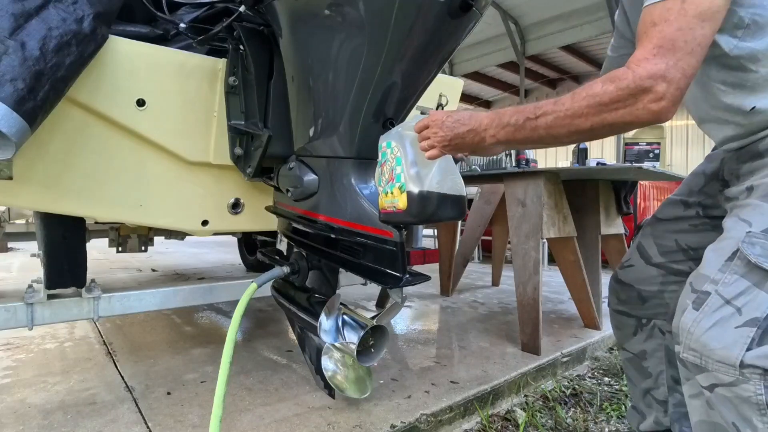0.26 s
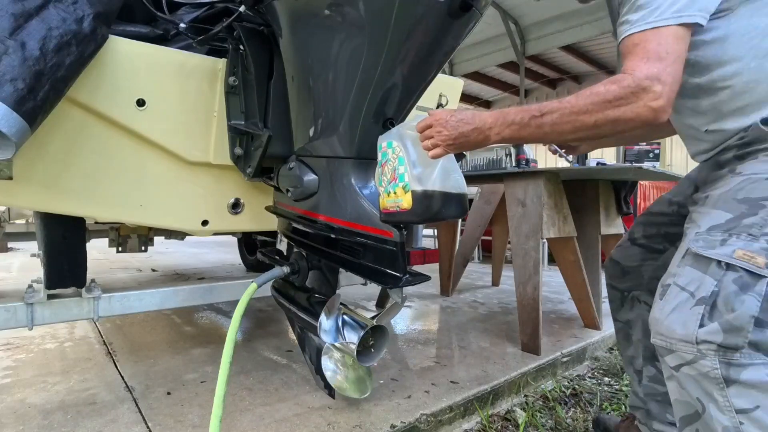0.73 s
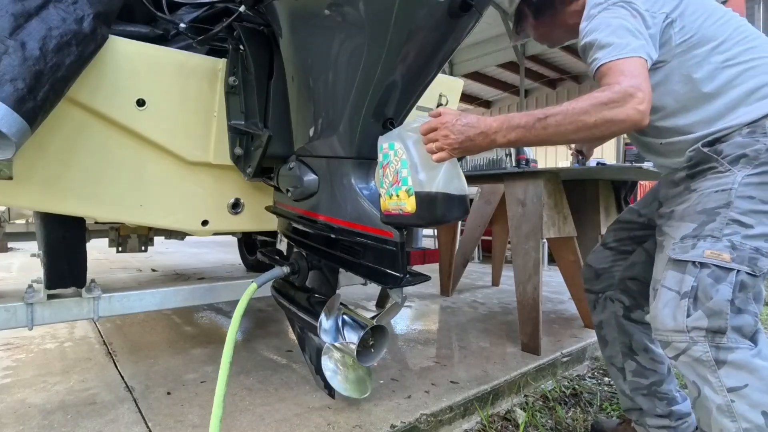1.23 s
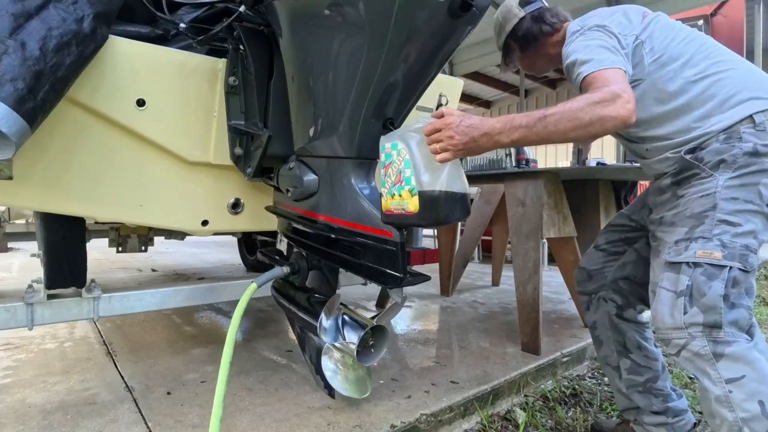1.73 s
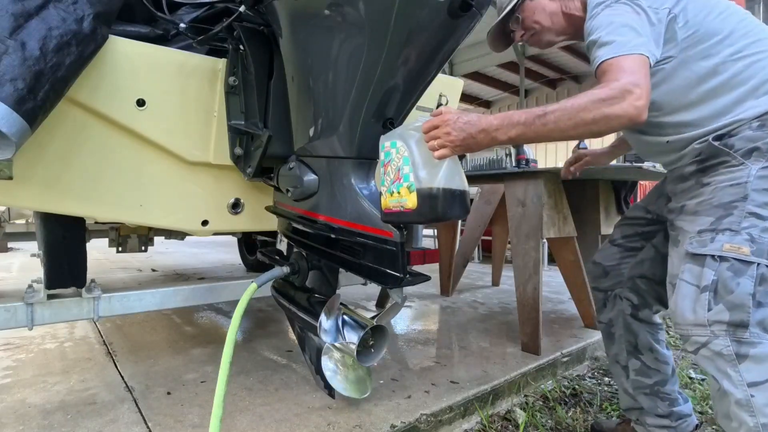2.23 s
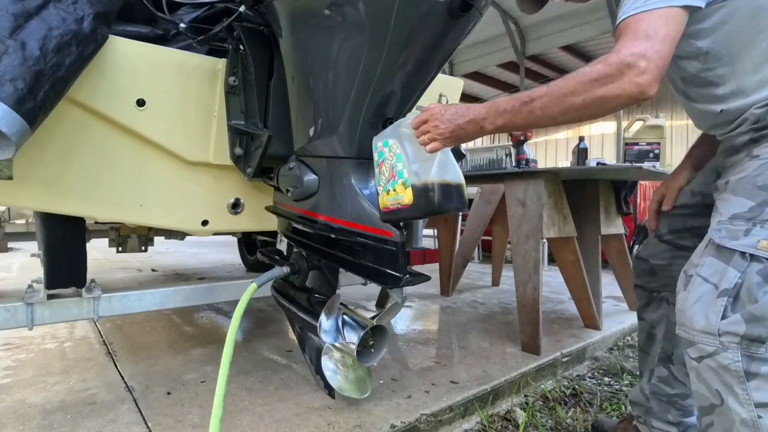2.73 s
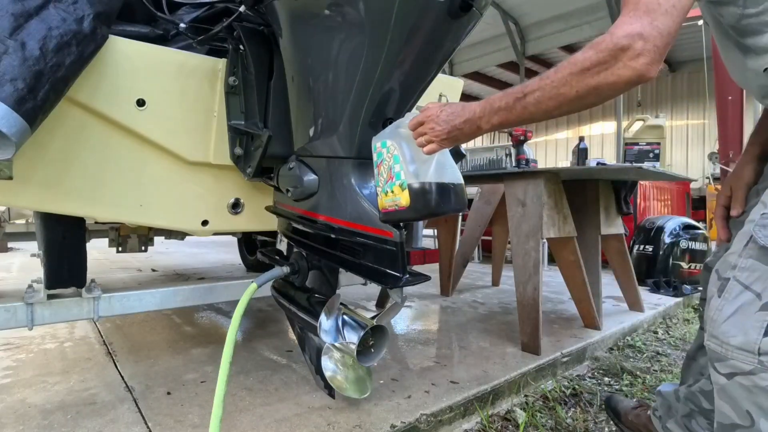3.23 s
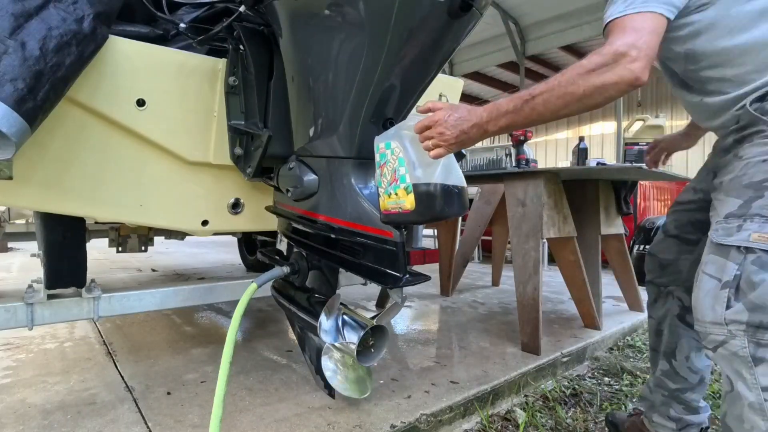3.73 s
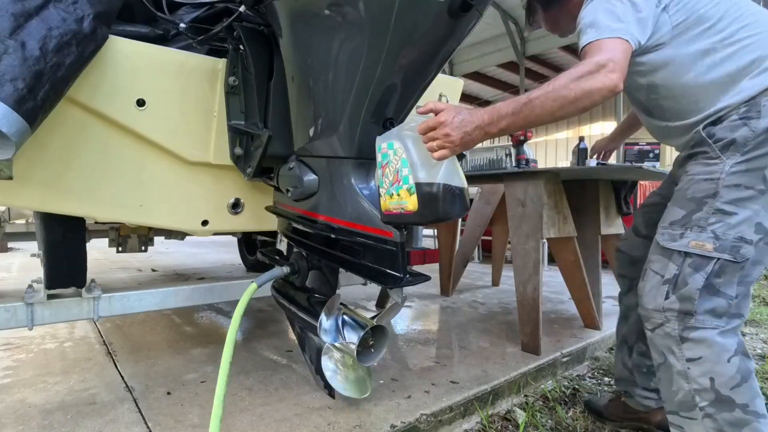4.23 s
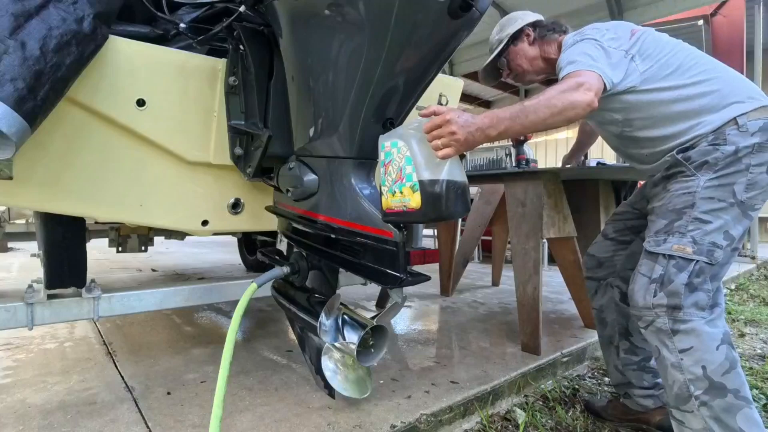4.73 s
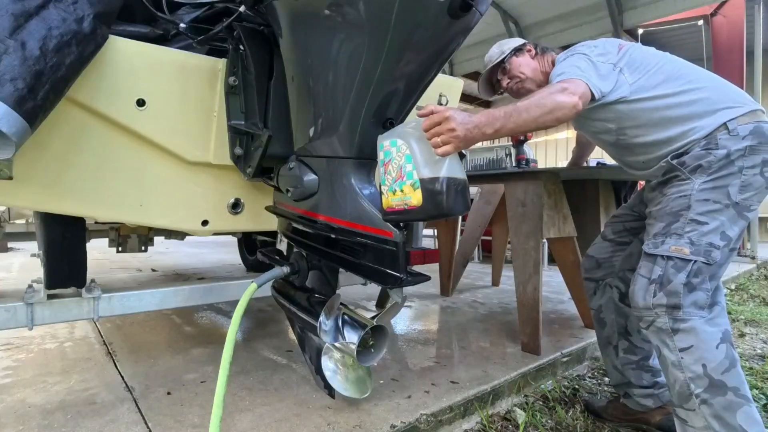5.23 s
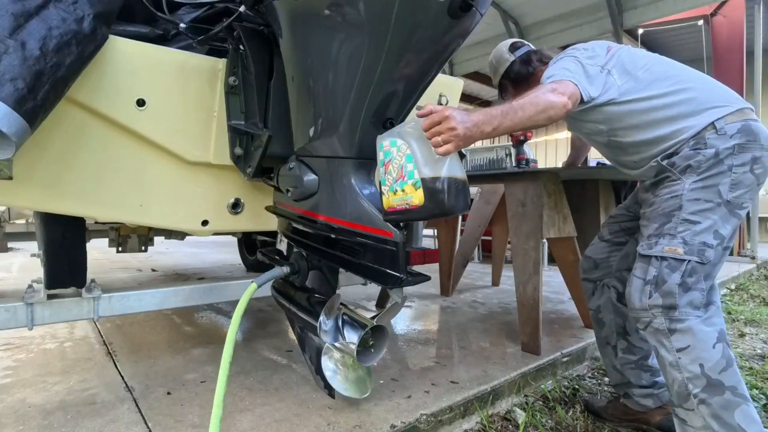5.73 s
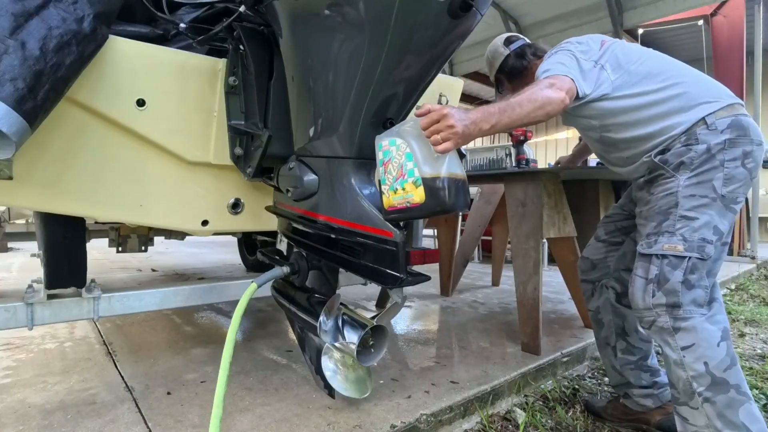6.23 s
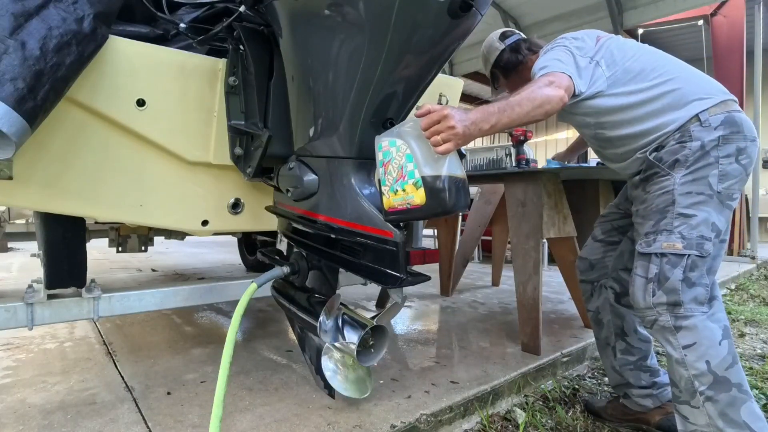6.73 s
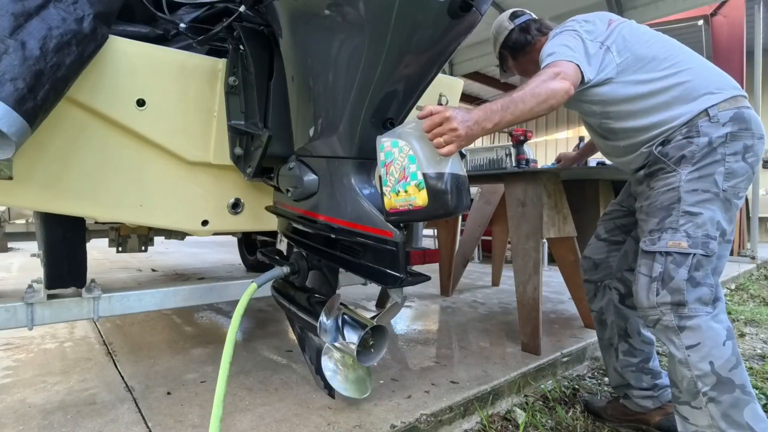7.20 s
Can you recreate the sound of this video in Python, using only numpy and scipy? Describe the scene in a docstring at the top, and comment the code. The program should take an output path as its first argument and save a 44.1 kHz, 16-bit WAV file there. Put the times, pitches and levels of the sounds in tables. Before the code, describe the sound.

Boots scuff on gritty concrete, a heavy wrench clatters onto a plywood bench, then small metal parts slide and clink over a low distant drone.

```python
"""Scuffs and a dropped wrench in a metal shed

Boots scuff on gritty concrete: clumped random grains, coloured as crunch and grit, with short sole yelps.
A wrench drops on a plywood bench, small parts tick, clink and slide there, and a jug bumps a motor:
blows ring tuned modes, drags are friction grains, ticks are noise puffs, clinks are beating partials.
The shed adds a dull echo. A flickering treble hiss, bird whistles, insect bands and a traffic drone lie
behind. A fast limiter ducks the loud blows."""
import sys
import numpy as np
from scipy import signal
from scipy.fft import rfft, irfft
from scipy.io import wavfile
from scipy.ndimage import uniform_filter1d

SR = 44100
rng = np.random.default_rng(int(sys.argv[2]) if len(sys.argv) > 2 else 0)


def unload_wav(signal):
    """Save mono or channel-first audio to the path in sys.argv[1] as 16-bit WAV at rate SR, clipped to [-1, 1]."""
    wavfile.write(
        sys.argv[1],
        SR,
        np.round(np.clip(np.atleast_2d(signal).T, -1, 1) * 32767).astype(np.int16),
    )


N = 328986  # length in samples


def amp(db):
    """Decibels to gain."""
    return 10 ** (np.asarray(db) / 20)


def rms_one(x):
    """Scale to unit rms."""
    return x / np.sqrt(np.mean(x ** 2) + 1e-20)


def drift(rate_hz):
    """Slow random wander of unit rms: noise smoothed by a double pole, at a fortieth of the sample rate."""
    pole = np.exp(-80 * np.pi * rate_hz / SR)
    white = rng.standard_normal(N // 40 + 2002)
    slow = signal.lfilter([1], [1, -2 * pole, pole * pole], white)
    slow = rms_one(slow[2000:])  # skip the filter's start
    return np.interp(np.arange(N) / 40, np.arange(len(slow)), slow)


def colour(x, spectrum):
    """Filter a signal by a table of frequency and relative level; unit rms."""
    hz, db = np.transpose(spectrum)
    grid_hz = np.maximum(np.fft.rfftfreq(N, 1 / SR), 1)
    gain = amp(np.interp(np.log(grid_hz), np.log(hz), db))
    return rms_one(irfft(rfft(x) * gain, N))


def narrow(hz, width_hz):
    """Noise passed twice through one resonance of this width; unit rms."""
    radius = np.exp(-np.pi * width_hz / SR)
    poles = [1, -2 * radius * np.cos(2 * np.pi * hz / SR), radius * radius]
    once = signal.lfilter([1, 0, -1], poles, rng.standard_normal(N))
    return rms_one(signal.lfilter([1, 0, -1], poles, once))


def ring(clicks, hz, t60_s):
    """A damped resonator: a unit click sets a sine of starting height 1 ringing."""
    radius = amp(-60 / (max(t60_s, .003) * SR))
    turn = 2 * np.pi * hz / SR
    poles = [1, -2 * radius * np.cos(turn), radius * radius]
    return signal.lfilter([0, np.sin(turn)], poles, clicks + 1e-18)


def strike(events, modes, spread_db, level_db, contact_s):
    """Each blow, a short chatter, rings every mode by a random share; a contact cut-off dulls its top."""
    t = np.arange(SR // 25) / SR
    out = np.zeros(N)
    luck = rng.normal(0, 1, (len(events), len(modes)))
    chatters = rng.standard_normal((len(events), len(t))) * np.exp(-t / contact_s)
    for k, (hz, mode_db, t60_s) in enumerate(modes):
        force = np.zeros(N)
        for (start_s, blow_db, *cut_hz), chatter, z in zip(events, chatters, luck[:, k]):
            softness = 1 / (1 + (hz / cut_hz[0]) ** 2) if cut_hz else 1
            near_mode = ring(chatter, hz, 11.4 / hz)  # keep the chatter close to the mode's pitch
            ring_peak = abs(ring(near_mode, hz, t60_s)).max()
            gain = softness * amp(blow_db + mode_db + level_db + spread_db * z)
            force[int(start_s * SR):][:len(t)] += gain * near_mode / ring_peak
        out += ring(force, hz, t60_s)
    return out


def puffs(events, octaves, decay_s):
    """Each event is a dying puff of noise in a band around its centre, scaled to its peak level."""
    out = np.zeros(N + SR)
    t = np.arange(SR // 10) / SR
    half_band = max(octaves, .1) * np.array([-.5, .5])
    for (start_s, peak_db, centre_hz), white in zip(events, rng.standard_normal((len(events), len(t)))):
        edges_hz = np.clip(centre_hz * 2 ** half_band, [300, 400], [14000, 18000])
        band = signal.butter(2, edges_hz, "band", fs=SR, output="sos")
        puff = signal.sosfilt(band, white * np.exp(-t / decay_s))
        out[int(start_s * SR):][:len(t)] += amp(peak_db) * puff / abs(puff).max()
    return out[:N]


def grains(per_s, spread_db, clump_db):
    """Random contacts of uneven size and either sign, whose size swells and sinks in clumps."""
    born = rng.random(N) < per_s / SR
    sizes = amp(spread_db * np.minimum(rng.exponential(1, N), 5) + clump_db * drift(37))
    return born * sizes * rng.choice([-1, 1], N)


def friction(gains, low_colour, high_colour, clump_db):
    """Dense contacts sound in a body and, from a denser set, in a treble."""
    body_gain, treble_gain = gains
    body = colour(grains(5000, 2.2, clump_db), low_colour)
    treble = colour(grains(9000, 3.22, clump_db), high_colour)
    return body_gain * body + treble_gain * treble


def stroke(rows):
    """Gains of body and treble along one stroke, silent outside it."""
    t = np.arange(N) / SR
    time_s, body_db, treble_share_db = np.transpose(rows)
    inside = (t >= time_s[0]) & (t <= time_s[-1])
    body = amp(np.interp(t, time_s, body_db)) * inside
    return body, body * amp(np.interp(t, time_s, treble_share_db))


def scuff_gains():
    """Each scuff swells to its peak and dies away; the powers of overlapping scuffs add."""
    # boots on grit: peak_s, crunch_db, rise_s, fall_s, treble_share_db (treble against crunch)
    scuff_rows = [(.02, -42, 0.33, 0.091, -3), (.55, -33.5, 0.0227, 0.063, -4), (.6, -47, .02, 0.19, -1.3),
                  (.812, -47, 0.012, 0.17, 2), (.986, -50, 0.28, 0.072, -6.5),
                  (1.025, -60.5, .08, .022, 7.5), (1.13, -68, 0.092, 0.065, 0),
                  (2.864, -57, 0.033, .1, 3.5), (2.916, -53, 0.047, 0.048, 0.5),
                  (3.0, -61, 0.12, 0.15, -2.5), (3.584, -50, 0.031, 0.024, -2.5),
                  (3.686, -55.5, 0.0097, 0.19, 0), (3.9, -37, 0.11, 0.13, 1.5), (3.99, -48, 0.23, .2, 8),
                  (4.06, -35.5, .035, 0.15, 2.5), (4.23, -30.5, 0.067, 0.095, -7),
                  (4.285, -27, 0.08, 0.039, -2), (4.33, -50, .02, .13, 4), (6.98, -64.5, .02, 0.018, -3),
                  (7.024, -58.5, 0.024, 0.018, -5)]
    span_db = 20  # rise and fall are the times to cover this much
    t, body, treble = np.arange(N) / SR, np.zeros(N), np.zeros(N)
    for peak_s, crunch_db, rise_s, fall_s, treble_share_db in scuff_rows:
        first = max(int((peak_s - 4 * rise_s) * SR), 0)
        near = slice(first, int((peak_s + 4 * fall_s) * SR))
        distance = np.maximum((peak_s - t[near]) / rise_s, (t[near] - peak_s) / fall_s)
        power = amp(crunch_db - span_db * distance) ** 2
        body[near] += power
        treble[near] += power * amp(treble_share_db) ** 2
    return np.sqrt(body), np.sqrt(treble)


def boots():
    """Soles grind grit on concrete as clumped grains; the rubber yelps in short pitched puffs."""
    # body of the scuffs: frequency_hz, relative_db per Hz
    crunch_colour = [(180, -42), (300, -4), (385, -4), (620, -5), (880, -8), (1480, -2.5), (1950, -2),
                     (2930, -4), (3840, -6.5), (4500, -8), (5850, -43.5), (9900, -120)]
    # treble of the scuffs: frequency_hz, relative_db per Hz
    grit_colour = [(2060, -33.5), (3500, -17.5), (4240, -12.5), (4840, 0), (7460, -1), (15000, -13),
                   (16000, -32.5)]
    # rubber sole yelps: start_s, peak_db, centre_hz
    yelp_rows = [(.541, -34, 2340), (0.563, -25, 1490), (3.861, -35, 1197), (4.216, -21, 2940),
                 (4.222, -17.5, 1434), (4.227, -23.5, 2850), (4.259, -23.5, 1400), (4.272, -23, 2310)]
    scuffing = friction(scuff_gains(), crunch_colour, grit_colour, clump_db=2.0)
    return scuffing + puffs(yelp_rows, octaves=0.27, decay_s=0.0073)


def bench_friction():
    """The wrench rattles out its fall and parts drag on plywood: grains in a board body and a treble."""
    # the wrench's fall: time_s, board_db, treble_share_db (treble against board)
    fall_rows = [(1.772, -56, -1), (1.776, -19.5, -8.5), (1.864, -12, -13.5), (1.944, -22.5, -12.5),
                 (2.01, -31, -17.5), (2.088, -41.5, -12.5), (2.4, -70.5, -35)]
    # board under the fall: frequency_hz, relative_db per Hz
    board_colour = [(53, -40.5), (90, -13.5), (119, -3), (236, -10), (284, -1.5), (341, -7.5), (404, -4),
                    (723, -11), (1010, -9), (1480, -13.5), (1760, -16.5), (2310, -21.5), (3500, -37.5),
                    (4550, -61.5), (7700, -120)]
    # treble of the fall: frequency_hz, relative_db per Hz
    jangle_colour = [(1650, -32), (2800, -6), (4840, -12), (6110, -7), (6250, -4.5), (6670, 0.5),
                     (7720, -15.5), (13700, -23), (16000, -34.5)]
    # parts dragged over the bench: time_s, board_db, treble_share_db (treble against board)
    slide_rows = [(5.68, -84, 0.5), (5.8, -65.5, 4), (5.93, -45.5, -10.5), (5.976, -51, -2.5),
                  (6.002, -47, -5), (6.014, -34, -1), (6.066, -42.5, -6), (6.19, -48.5, -3.5),
                  (6.56, -44.5, -9), (6.57, -32, -16), (6.63, -40, -9.5), (6.678, -37, -15),
                  (6.72, -77, -22)]
    # board under the dragging: frequency_hz, relative_db per Hz
    drag_colour = [(150, -22), (250, -2), (302, 2.5), (480, -7.5), (871, -12.5), (962, -14), (1460, -13.5),
                   (1580, -16), (3500, -29.5), (4550, -52), (7700, -120)]
    # treble of the dragging: frequency_hz, relative_db per Hz
    sheen_colour = [(1650, -5.5), (2800, -2.5), (4470, -8), (5440, -8), (7550, -10), (11700, -21.5),
                    (16000, -34)]
    fall = friction(stroke(fall_rows), board_colour, jangle_colour, clump_db=1.5)
    slide = friction(stroke(slide_rows), drag_colour, sheen_colour, clump_db=1.5)
    return fall + slide


def bench_knocks():
    """Blows on plywood ring its damped modes; a softer contact excites less of the top."""
    # knocks on the bench: start_s, relative_db, contact_cut_hz (higher is harder)
    knock_rows = [(1.7755, -6, 3000), (1.80, -14, 2500), (1.819, -0.5, 2500), (1.849, -7, 2000),
                  (1.88, -4.5, 1500), (1.951, -2.5, 450), (1.973, -7, 1520), (2.028, -13, 463),
                  (5.921, -31.5, 3020), (6.013, -52, 4000), (6.033, -45, 3000), (6.069, -22, 900),
                  (6.359, -30.5, 1500), (6.492, -24.5, 2000), (6.569, -20.5, 1490), (6.599, -20, 1200),
                  (6.659, -20, 920)]
    # modes of the bench: frequency_hz, relative_db, t60_s
    bench_modes = [(286.8, -3, 0.15), (386.5, -12, 0.16), (626, -6.5, 0.042), (896, -3, .05),
                   (1070, -13.5, 0.077), (1095, 0.5, 0.048), (1298, -10.5, 0.13), (1450, -4, .07),
                   (1468, -7, 0.033), (1935, -1, 0.062), (2150, 0, 0.044)]
    return strike(knock_rows, bench_modes, spread_db=2.5, level_db=-13, contact_s=0.002)


def wrench():
    """Steel bounces ring a close cluster of bright modes; the ringing level flutters at random."""
    # bounces of the wrench: start_s, relative_db
    bounce_rows = [(1.7759, -14.5), (1.7948, -21), (1.8194, -22), (1.8494, -17), (1.8682, -16)]
    # modes of the wrench: frequency_hz, relative_db, t60_s
    wrench_modes = [(4124, -10, .25), (5927, -12, .45), (6330, -10, .25), (6400, -6, .3), (6442, -2, .36),
                    (6476, 0, .4), (6520, -3, .33), (6590, -6, .3), (6680, -10, .25), (10140, -18, .25),
                    (13320, -24, .2)]
    flutter = amp(4.0 * drift(35))
    return flutter * strike(bounce_rows, wrench_modes, spread_db=3.0, level_db=-16, contact_s=.003)


def jug():
    """The jug bumps the motor: a set of short, low modes is struck."""
    # bumps of the jug: start_s, relative_db
    bump_rows = [(6.789, -37), (6.797, -40.5), (6.848, -45), (6.858, -38.5), (6.9015, -18), (6.9045, -20.5),
                 (6.922, -47)]
    # modes of the jug: frequency_hz, relative_db, t60_s
    jug_modes = [(290, -4, .03), (400, -7, .025), (600, 0, .022), (760, -2, .02), (920, -2, .018),
                 (1100, -3, .018), (1350, -8, .014), (1650, -12, .012), (2000, -14, .01), (2600, -17, .01)]
    return strike(bump_rows, jug_modes, spread_db=1.5, level_db=-8, contact_s=.003)


def gritty_ticks():
    """Tiny hard contacts, each a very short puff of banded noise."""
    # ticks: start_s, peak_db, centre_hz
    tick_rows = [(0.131, -46, 5700), (0.173, -44, 6800), (0.5387, -21, 2200), (0.563, -32, 2240),
                 (0.7337, -45.5, 7740), (0.7766, -47, 6190), (0.818, -27.5, 8400), (0.8455, -40, 7000),
                 (0.966, -37.5, 3370), (1.12, -57, 3200), (1.355, -59, 7500), (1.502, -61, 9500),
                 (1.6277, -44.5, 7670), (1.694, -53, 10100), (1.7786, -27, 6360), (2.289, -55, 2900),
                 (2.3511, -45.5, 5940), (2.5935, -49.5, 8300), (2.856, -40, 7250), (2.88, -43.5, 8400),
                 (2.9163, -41, 3230), (3.043, -42, 7000), (3.123, -42.5, 6840), (3.16, -49, 7500),
                 (3.255, -53, 3760), (3.38, -39.5, 6560), (3.4235, -37, 6570), (3.667, -42.5, 8500),
                 (3.678, -42.5, 2720), (3.8475, -26.5, 6840), (3.897, -23, 4600), (4.1954, -25, 2370),
                 (4.479, -49.5, 7650), (4.625, -54.5, 6500), (4.655, -47, 5000), (4.662, -50, 2470),
                 (4.805, -64, 5000), (4.829, -59, 2240), (4.875, -61, 5200), (5.224, -53.5, 9700),
                 (5.521, -59.5, 2460), (6.0167, -29, 5500), (6.374, -43, 5500), (6.531, -29.5, 6100),
                 (6.532, -34, 2500), (6.757, -46, 6460), (6.765, -58, 3000), (6.9008, -41, 2650),
                 (6.803, -58, 6500), (7.1736, -50, 6360), (7.2, -37.5, 6660), (7.201, -50, 2800)]
    return puffs(tick_rows, octaves=0.63, decay_s=0.0046)


def clinks():
    """Close partials beat as a small metal part rings out, the weaker ones dying sooner; the level wavers."""
    # clinking parts: start_s, relative_db, pitch_hz, base_t60_s (each partial scales it by its strength)
    clink_rows = [(3.578, -45.5, 6590, 0.05), (5.359, -56, 6480, 0.14), (6.0125, -36, 6075, 0.16),
                  (6.033, -40, 6050, 0.34), (6.492, -53, 7400, 0.19)]
    # pitch ratio, strength
    partials = [(.98, 0.12), (1, 0.85), (1.009, 0.93), (1.024, .5), (1.058, 0.59)]
    out, t = np.zeros(N + SR), np.arange(SR // 2) / SR
    onset = np.minimum(t / 0.00046, 1)
    for start_s, relative_db, pitch_hz, base_t60_s in clink_rows:
        tone = np.zeros(len(t))
        for ratio, strength in partials:
            decay = amp(-60 * t / (base_t60_s * strength))
            tone += strength * np.sin(2 * np.pi * pitch_hz * ratio * t) * decay
        out[int(start_s * SR):][:len(t)] += amp(relative_db) * onset * tone
    return amp(3.5 * drift(60)) * out[:N]


def shed(x):
    """Metal roof and walls return a diffuse, dull echo: decaying low-passed noise after an 8 ms gap."""
    t60_s, echo_db, cut_hz = 0.33, -29, 3500
    t = np.arange(SR) / SR
    tail = rng.standard_normal(SR) * amp(-60 * t / t60_s) * (t > .008)
    tail = signal.sosfilt(signal.butter(1, cut_hz, fs=SR, output="sos"), tail)
    tail = tail / np.sqrt(np.sum(tail ** 2))
    return amp(echo_db) * signal.fftconvolve(x, tail)[:N]


def treble_flicker():
    """A faint treble hiss whose narrow bands flicker, partly together."""
    # course of the hiss: time_s, level_db
    hiss_levels = [(0, -91), (.45, -83), (1.6, -75.5), (2.1, -66), (2.4, -63.5), (2.7, -74), (3.1, -65.5),
                   (3.4, -69), (4.45, -74), (5.0, -82), (5.5, -83.5), (5.75, -72), (6.999, -86),
                   (7.46, -84.5)]
    # tint of the bands: frequency_hz, relative_db
    hiss_tint = [(2200, 4), (3000, -1.5), (4300, -8.5), (6500, 1), (10000, 4.5), (14500, -5)]
    time_s, level_db = np.transpose(hiss_levels)
    tint_hz, tint_db = np.transpose(hiss_tint)
    together_db = 2.2 * drift(14)
    bands = np.zeros(N)
    for hz in np.geomspace(2200, 14500, 22):
        flicker_db = together_db + 5.0 * drift(14)
        bands += amp(np.interp(hz, tint_hz, tint_db) + flicker_db) * narrow(hz, 150 + hz / 30)
    return amp(np.interp(np.arange(N) / SR, time_s, level_db)) * rms_one(bands)


def bird():
    """Gliding near-sines with soft ends; pitch jitter makes them husky, level jitter broken."""
    # whistles: start_s, length_s, first_pitch_hz, last_pitch_hz, level_db (before the level jitter)
    whistle_rows = [(0.23, 0.049, 2720, 2780, -68.5), (.465, 0.065, 2950, 2950, -65),
                    (1.107, .065, 3010, 3150, -70), (1.162, 0.27, 3300, 3030, -71.5),
                    (4.627, 0.11, 2620, 2400, -68.5), (5.028, 0.17, 2670, 2630, -67),
                    (5.197, 0.15, 2740, 2910, -76)]
    edge_share = 0.14  # of the length, for each fade
    t, hz, gain = np.arange(N) / SR, np.zeros(N), np.zeros(N)
    for start_s, length_s, first_hz, last_hz, level_db in whistle_rows:
        along = (t - start_s) / length_s
        on = (along > 0) & (along < 1)
        hz[on] = first_hz + (last_hz - first_hz) * along[on]
        to_edge = np.minimum(along, 1 - along)[on]
        gain[on] = amp(level_db) * np.minimum(to_edge / edge_share, 1)
    husky_hz = hz * (1 + .022 * drift(300))
    tone = np.sin(2 * np.pi * np.cumsum(husky_hz) / SR)
    return gain * amp(4.1 * drift(40)) * tone


def background():
    """Far traffic drones as coloured noise and excites shed hums; insects shrill in narrow bands over hiss."""
    # traffic drone: time_s, broad_db, low_hum_db, high_hum_db
    drone_levels = [(0.0, -33.5, -33, -48), (0.33, -39, -40.5, -48), (0.6, -38, -39.5, -60),
                    (0.9, -38.5, -40.5, -54), (1.25, -38.5, -41.5, -54), (1.7, -39.5, -50, -48),
                    (2.2, -39, -48.5, -50), (2.6, -39.5, -49.5, -54), (3.3, -40.5, -57, -54.5),
                    (3.75, -40.5, -42, -50), (4.1, -39.5, -49.5, -44), (4.75, -41.5, -36.5, -43.5),
                    (5.0, -41.5, -45.5, -45.5), (5.2, -40, -40.5, -49.5), (5.65, -41, -39, -53.5),
                    (6.05, -42, -42, -42.5), (6.69, -43, -39, -49.5), (6.94, -43, -50, -44),
                    (7.46, -44.5, -46, -59.5)]
    # tone of the drone: frequency_hz, relative_db per Hz
    drone_colour = [(12, -37), (20, -1.5), (59, -4.5), (82, -11), (129, -5), (204, -14), (234, -14.5),
                    (323, -21.5), (414, -24), (501, -29), (887, -33), (1070, -42.5), (1900, -48.5),
                    (2470, -78.5), (4180, -120)]
    # shed resonances, low then high: frequency_hz, width_hz (of each of two passes)
    hum_bands = [(125, 33), (197, 18.7)]
    # insect bands: frequency_hz, width_hz (of each of two passes), level_db (before the flutter)
    insect_bands = [(9360, 210, -85.5), (10500, 100, -81.5)]
    time_s, *levels = np.transpose(drone_levels)
    broad_db, *hum_db = [np.interp(np.arange(N) / SR, time_s, db) for db in levels]
    out = amp(broad_db) * colour(rng.standard_normal(N), drone_colour)
    for (hz, width_hz), level_db in zip(hum_bands, hum_db):
        out = out + amp(level_db) * narrow(hz, width_hz)
    for hz, width_hz, level_db in insect_bands:
        out = out + amp(level_db + 3.5 * drift(12)) * narrow(hz, width_hz)
    air_db = -93.5
    return out + amp(air_db) * rng.standard_normal(N)


def scene():
    """Near contacts with their echo over the treble hiss, the bird and the background."""
    near = boots() + bench_friction() + bench_knocks() + wrench()
    near = near + jug() + gritty_ticks() + clinks()
    return (near + shed(near) + treble_flicker() + bird() + background())[None]


def record(dry):
    """A fast limiter ducks what passes a ceiling and lets go steadily; then the top is cut."""
    limit_db, release_db_per_s, stop_hz = -8.8, 66, 16200
    over_db = np.maximum(20 * np.log10(abs(dry) + 1e-9) - limit_db, 0)
    release_db = release_db_per_s * np.arange(N) / SR
    held_db = np.maximum.accumulate(over_db + release_db, axis=1) - release_db
    # averaging over the next 1 ms lets the duck begin ahead of a blow
    duck = amp(-uniform_filter1d(held_db, size=45, origin=-22))
    top_cut = signal.cheby2(12, 70, stop_hz, fs=SR, output="sos")
    return signal.sosfilt(top_cut, duck * dry)


dry = scene()
out = record(dry)
unload_wav(out)
```